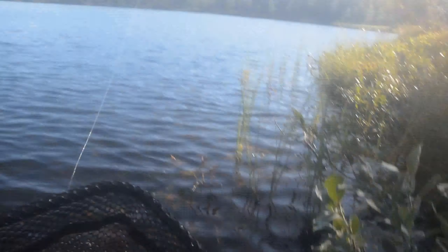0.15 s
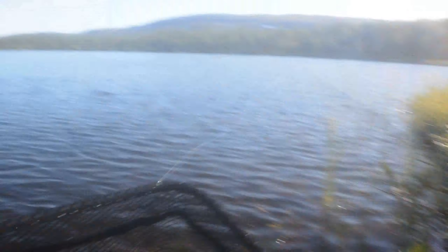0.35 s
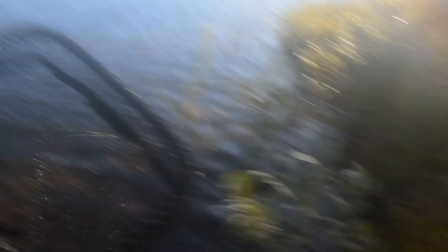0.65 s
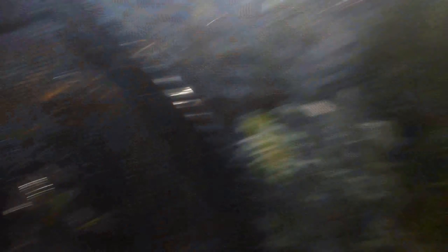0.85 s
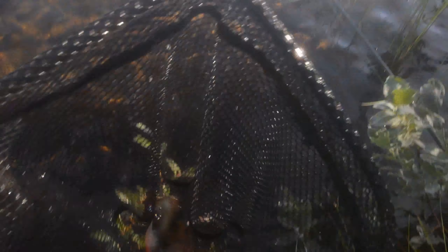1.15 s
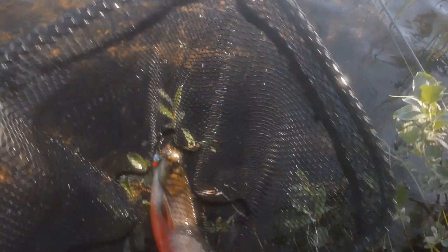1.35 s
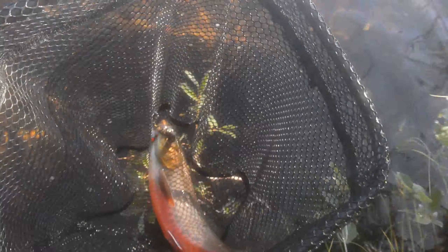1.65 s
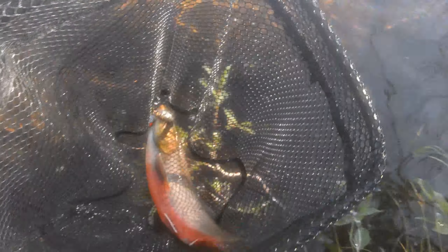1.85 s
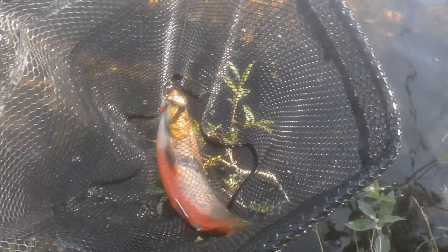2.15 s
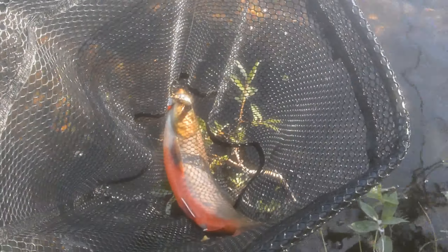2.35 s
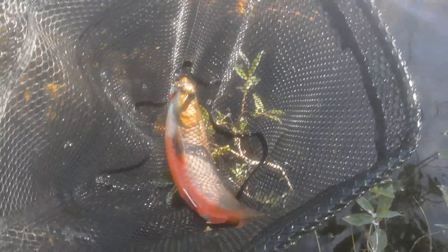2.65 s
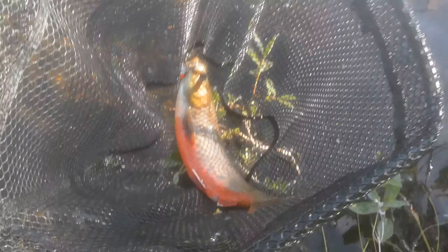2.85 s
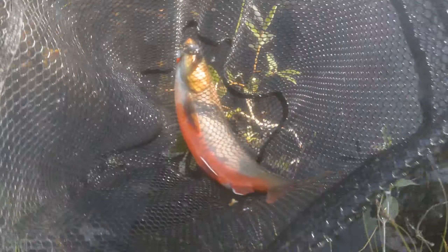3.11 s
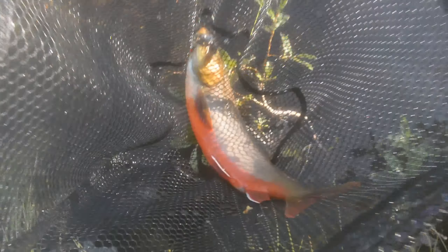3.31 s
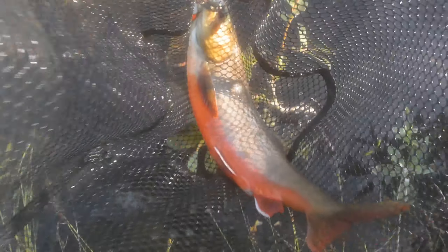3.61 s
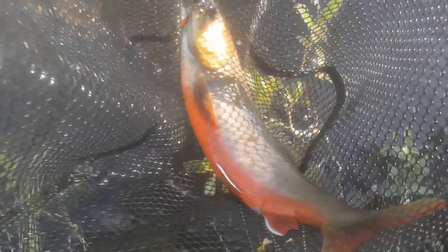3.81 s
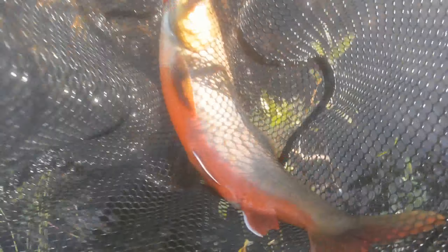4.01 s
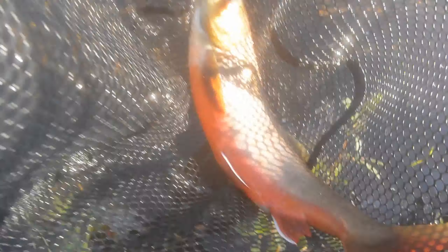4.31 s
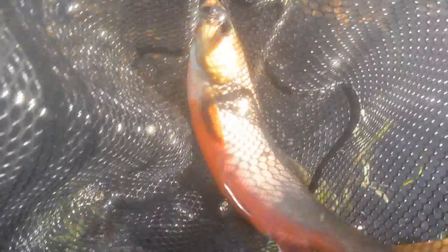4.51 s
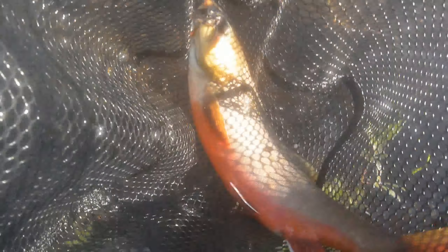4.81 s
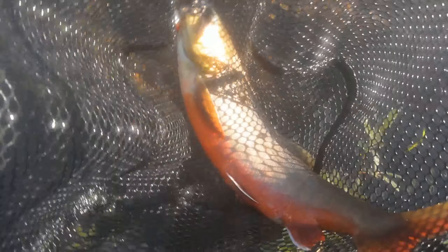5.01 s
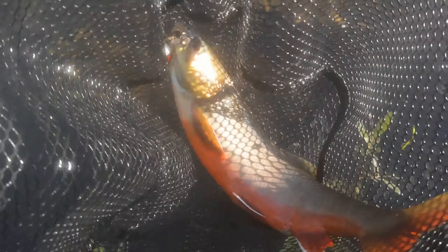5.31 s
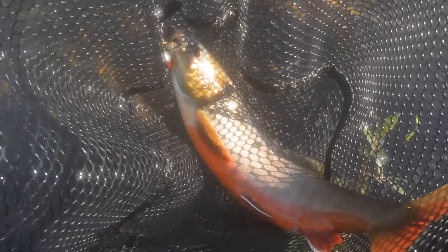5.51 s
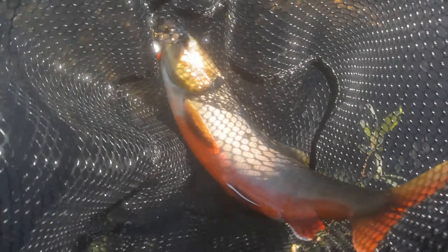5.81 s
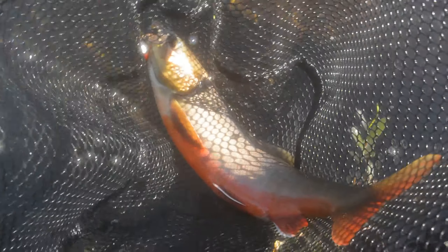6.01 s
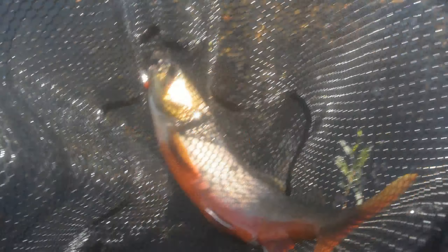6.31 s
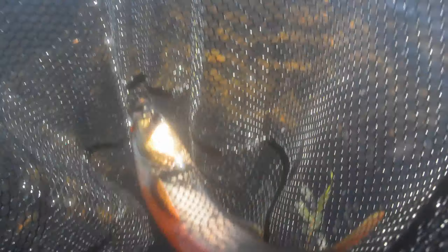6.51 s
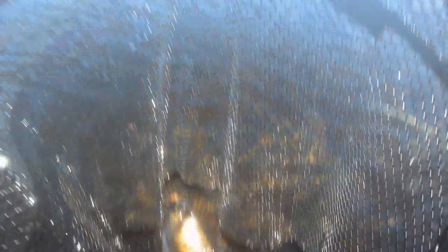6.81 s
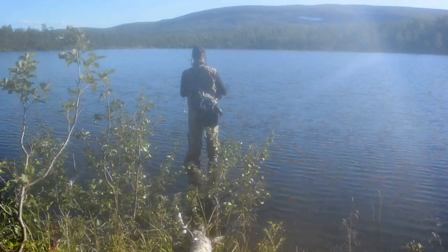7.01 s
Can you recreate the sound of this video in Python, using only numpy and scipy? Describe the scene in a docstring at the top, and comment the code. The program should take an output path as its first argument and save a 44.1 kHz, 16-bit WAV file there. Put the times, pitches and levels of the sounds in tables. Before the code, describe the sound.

Outdoors in shallow lake water, heard close and dry: soft slosh and squelch, a thin high whistle flaring once, then about half a second of crowded sharp slaps and splashing against a hollow plastic case. The background ducks after the hardest hits. Sparse ticks, knocks and drips follow over very quiet water, then a quick gushing splash, a bloop, and soft dripping.

```python
"""Water sloshes and squelches through the mesh of a landing net worked in the shallows of a lake.
It is heard close by, on a small stereo microphone in a plastic housing: the wash is banded noise and
droplets, slaps and drops ring the wet housing, squelches are crackle in a resonance, a whistle flares once.
A late splash drums in gushes and ends in a rising bubble; pushes rumble through the housing underneath.
A gain control ducks the background after the hardest slaps."""
import sys
import numpy as np
from scipy import signal
from scipy.io import wavfile

SR = 44100
rng = np.random.default_rng(int(sys.argv[2]) if len(sys.argv) > 2 else 0)


def unload_wav(signal):
    """Save mono or channel-first audio to the path in sys.argv[1] as 16-bit WAV at rate SR, clipped to [-1, 1]."""
    wavfile.write(
        sys.argv[1],
        SR,
        np.round(np.clip(np.atleast_2d(signal).T, -1, 1) * 32767).astype(np.int16),
    )


N = 315315   # samples
RIGHT_LAG = 5   # samples by which water reaches the right port later
WATER_TOP_HZ = 10340   # the wash has almost nothing above


def from_db(db):
    """Gain of a level in dB."""
    return 10 ** (np.asarray(db) / 20)


def rms_one(x):
    """Scaled to rms 1."""
    return x / np.sqrt(np.mean(x ** 2) + 1e-20)


def peak_one(x):
    """Scaled to peak 1."""
    return x / np.abs(x).max()


def in_time(rows):
    """Columns of a curve, joined by straight lines to one value a sample."""
    s, *columns = np.transpose(rows)
    return [np.interp(np.arange(N) / SR, s, column) for column in columns]


def at_hz(points, hz):
    """A spectrum read on a log-frequency axis."""
    points = np.array(points)
    return np.interp(np.log(hz), np.log(points[:, 0]), points[:, 1])


def drift(rate_hz):
    """A random curve of spread 1 that wanders mostly below the rate, drawn at every 40th sample."""
    r = np.exp(-80 * np.pi * rate_hz / SR)
    noise = rng.standard_normal(N // 40 + 2002)
    slow = rms_one(signal.lfilter([1], [1, -2 * r, r * r], noise)[2000:])   # settled part only
    return np.interp(np.arange(N) / 40, np.arange(len(slow)), slow)


def ring(clicks, hz, t60):
    """A damped mode: a unit click sets a sine of height 1 ringing, down 60 dB after t60 seconds."""
    r, w = from_db(-60 / (t60 * SR)), 2 * np.pi * hz / SR
    return signal.lfilter([0, np.sin(w)], [1, -2 * r * np.cos(w), r * r], clicks + 1e-18)


def resonance(x, hz, width_hz):
    """A band-pass of gain 1 on top."""
    r = np.exp(-np.pi * width_hz / SR)
    feedback = [1, -2 * r * np.cos(2 * np.pi * hz / SR), r * r]
    return signal.lfilter([(1 - r * r) / 2, 0, (r * r - 1) / 2], feedback, x)


def resonance_twice(x, hz, width_hz):
    """The same band-pass two times over, for steeper sides."""
    return resonance(resonance(x, hz, width_hz), hz, width_hz)


def high_pass(x, hz):
    """Bass cut of fourth order."""
    return signal.sosfilt(signal.butter(4, hz, "high", fs=SR, output="sos"), x)


def dull(x):
    """Almost nothing is left above the top of the wash."""
    return signal.sosfilt(signal.cheby2(10, 50, WATER_TOP_HZ, fs=SR, output="sos"), x)


def droplets(per_s, spread_db):
    """Sparse clicks of very uneven size, other ones on each side; rms 1."""
    sizes = from_db(spread_db * np.minimum(rng.exponential(1, (2, N)), 4))
    signed = sizes * rng.choice([-1, 1], (2, N))
    return rms_one(signed * (rng.random((2, N)) < per_s / SR))


# How alike left and right are across the spectrum.
# Each row: frequency in Hz, likeness from -1 (opposed) to 1 (identical).
LIKENESS = [(60, 0.33), (125, 0.4), (250, 0.5), (400, 0.7), (700, 0.1), (1650, 0.5), (4970, -0.16),
            (15000, 0.6)]


def banded(source, spectrum, edges, level_db, patchy_db):
    """Half-octave bands of a stereo source, each with its level in time, flicker and likeness."""
    out, together = 0, drift(22.0)
    for k, (low, high) in enumerate(zip(edges, edges[1:])):
        band_pass = signal.butter(2, [low, high], "band", fs=SR, output="sos")
        mid, side = signal.sosfilt(band_pass, source[k % 2])   # neighbours use different noise
        hz = np.sqrt(low * high)
        alike = np.clip(at_hz(LIKENESS, hz), -1, 1)
        flicker_db = patchy_db * (0.61 * together + drift(13))
        gain = from_db(at_hz(spectrum, hz) + level_db(hz) + flicker_db)
        stereo = np.sqrt(1 + alike) * mid + np.sqrt(1 - alike) * side * [[1], [-1]]
        out = out + gain * stereo
    return out


# Colour of the rumble. Each row: frequency in Hz, relative level per Hz in dB.
RUMBLE = [(12, -28), (20, -6), (33, -13.5), (75, -8), (130, -10.5), (205, -3), (260, -3), (320, -33),
          (550, -120)]
# Pushes through the housing. Each row: peak time in seconds, relative peak level in dB.
PUSHES = [(0.0, -43), (0.696, -35.5), (0.722, -52), (0.752, -26.5), (0.97, -37.5), (1.002, -36.5),
          (1.08, -45), (1.41, -50), (1.61, -57), (2.03, -71), (2.43, -64), (3.09, -49.5), (3.46, -58),
          (4.66, -57), (5.06, -70), (6.27, -57), (6.75, -61), (7.07, -53)]
PUSH_RISE_DB_PER_S, PUSH_FALL_DB_PER_S = 600.5, 602.5
MURMUR_DB = -68   # on the scale of the pushes


def rumble():
    """Handling and water pushes over a steady murmur; the pushes are weaker in the deepest bass."""
    t = np.arange(N) / SR
    push = 0
    for s, db in PUSHES:
        fall_away_db = np.maximum(PUSH_RISE_DB_PER_S * (s - t), PUSH_FALL_DB_PER_S * (t - s))
        push = push + from_db(db - fall_away_db)

    def band_db(hz):
        """Push and murmur added as amplitudes."""
        return 23.4 + 20 * np.log10(push * from_db(-6 * (hz < 55)) + from_db(MURMUR_DB))
    edges = 20 * 2 ** np.arange(0, 4.1, .5)
    return banded(rng.standard_normal((2, 2, N)), RUMBLE, edges, band_db, patchy_db=1.5)


WHISTLE_HZ, WHISTLE_WIDTH_HZ = 14330, 120
WHISTLE_S, WHISTLE_WIDTH_S = 0.485, 0.21   # moment of the flare, scale of its skirts
WHISTLE_DB, WHISTLE_FADE_DB = -35.5, 138.5


def whistle():
    """A thin high whistle flares once: noise through a narrow resonance, sharp peak and long skirts in time."""
    tone = resonance_twice(rng.standard_normal(N), WHISTLE_HZ, WHISTLE_WIDTH_HZ)
    away = np.abs(np.arange(N) / SR - WHISTLE_S) / WHISTLE_WIDTH_S
    fade_db = WHISTLE_FADE_DB * away / (1 + away) + WHISTLE_FADE_DB * away / 10
    return from_db(WHISTLE_DB - fade_db) * rms_one(tone)


# Sloshing in time. Each row: time in seconds, relative level of the body (1.2-3.5 kHz) in dB,
# gurgle below it and spray above it as tilts in dB against the body.
SLOSH = [(0.0, -37.5, 1.5, -9), (0.16, -33.5, -4.5, -9.5), (0.26, -39, -1, -10.5), (0.6, -41, 2, -8.5),
         (0.76, -36, 3.5, -12), (0.825, -26.5, -5, 0), (0.834, -44, -8, -24), (0.843, -32, -14, -21),
         (0.852, -30, -8, -11), (0.89, -25.5, -3, -10), (0.97, -27.5, 1, -11), (1.04, -41.5, 2.5, -7),
         (1.2, -51.5, -2.5, -9.5), (1.42, -51.5, 7.5, -6.5), (1.54, -54, 5, -9.5), (1.92, -60, 2.5, -8),
         (2.44, -56, 3.5, -13), (2.82, -59, 3, -11.5), (3.1, -53, 3.5, -10.5), (3.26, -53, 2, -14),
         (3.38, -42, -6.5, -18), (3.48, -50, 2, -15), (3.56, -54.5, 3.5, -7.5), (3.94, -54.5, 1.5, -11.5),
         (4.1, -50.5, -1, -13.5), (4.42, -55.5, 1, -10.5), (4.64, -54.5, 8, -8), (4.9, -58.5, 3, -14.5),
         (5.2, -62, 4.5, -11), (5.9, -61, 2.5, -11), (6.02, -56.5, -0.5, -16), (6.3, -56.5, 1.5, -11),
         (6.6, -53, 1.5, -12.5), (6.88, -50.5, 5, -11), (7.105, -50.5, 7.5, -6.5), (7.125, -67, 9, -11),
         (7.15, -57, -8, -15)]
# Colour of the water. Each row: frequency in Hz, relative level per Hz in dB.
WATER = [(120, -36), (200, -10.5), (409, -4.5), (1120, -2), (1650, -12), (2700, -5.5), (4520, -9.5),
         (5630, -22.5), (7680, -24), (9060, -28), (9930, -60.5), (10900, -29.5), (11500, -53),
         (12400, -43.5), (16000, -60.5)]
# Resonances added to the water. Each row: frequency in Hz, width in Hz, gain in dB.
WATER_PEAKS = [(403, 290, -3.5), (1997, 220, 1.5), (2560, 1400, -11.5), (4860, 310, 4.5), (7000, 634, 14)]


def slosh():
    """Hiss and droplets in the colour of the water; gurgle and spray lean on the level of the body."""
    body_db, gurgle_db, spray_db = in_time(SLOSH)

    def band_db(hz):
        """Body, with gurgle or spray blended in by pitch."""
        octave = np.log2(hz / 1000)
        low = np.interp(octave, [-.3, .6], [1, 0])
        high = np.interp(octave, [1.4, 2.2], [0, 1])
        return body_db + low * (gurgle_db - 3.0) + high * (spray_db + 7.5) + 12
    source = rng.standard_normal((2, 2, N)) + 0.47 * droplets(400, spread_db=5.5)
    edges = 190 * 2 ** np.arange(0, 6.6, .5)
    water = banded(source, WATER, edges, band_db, patchy_db=2.0)
    return water + sum(from_db(db) * resonance(water, hz, width_hz) for hz, width_hz, db in WATER_PEAKS)


# Water squeezed through the mesh. Each row: start in seconds, length in seconds, relative level in dB,
# pitch of the pocket in Hz, width of its resonance in Hz.
SQUELCHES = [(0.049, 0.027, -44, 2330, 300), (0.088, 0.03, -45.5, 447, 250),
             (0.095, 0.11, -40.5, 4300, 800), (0.123, 0.026, -42, 800, 500), (0.155, 0.014, -46, 468, 300),
             (0.169, 0.084, -42.5, 4290, 400), (0.168, 0.066, -47, 750, 300),
             (0.695, 0.035, -42, 3500, 3000), (0.768, 0.02, -35, 2510, 3000), (0.615, 0.035, -46, 660, 895),
             (0.676, 0.037, -38, 4300, 3270), (0.743, 0.028, -26.5, 2500, 4100),
             (0.785, 0.063, -35, 417, 304), (0.847, 0.098, -34, 420, 300), (0.92, .17, -47, 392, 250),
             (0.984, 0.12, -44.5, 2310, 1810), (0.955, 0.052, -34, 1920, 900), (1.11, 0.24, -57, 413, 196),
             (1.417, 0.061, -53.5, 455, 302), (1.447, 0.013, -45.5, 1160, 400),
             (1.411, 0.0056, -32.5, 1470, 2460), (0.298, 0.038, -46, 2100, 600),
             (0.384, 0.045, -43, 2160, 500), (0.455, 0.1, -46.5, 2100, 450),
             (0.436, 0.069, -49, 7150, 1500), (3.138, 0.023, -52.5, 2120, 300),
             (3.293, 0.026, -55, 2260, 1500), (3.351, 0.15, -56, 466, 348), (3.496, 0.031, -45, 2180, 500),
             (3.76, 0.12, -55, 1890, 303), (3.765, 0.11, -49.5, 2800, 550),
             (3.748, 0.13, -51.5, 4100, 1860), (4.618, 0.067, -57, 1180, 1500),
             (6.45, 0.06, -36.5, 456, 50), (7.032, 0.084, -48, 2450, 2920)]
ALIKE_BELOW_HZ = 1200   # deeper squelches reach both ports more alike


def squelches():
    """Crackling droplets twice through the resonance of the squeezed pocket."""
    out, crackle = np.zeros((2, N)), droplets(2500, spread_db=3.0)
    for s, length_s, level_db, hz, width_hz in SQUELCHES:
        at, n = round(s * SR), round(length_s * SR)
        shared = crackle[0, N - at - n:N - at]   # the same on both sides
        near = crackle[:, at:at + n] + ALIKE_BELOW_HZ / hz * shared
        pocket = rms_one(resonance_twice(near, hz, width_hz))
        out[:, at:at + n] += from_db(level_db + 7.0) * signal.windows.tukey(n, .4) * pocket
    return out


# Single bubbles. Each row: start in seconds, level at the start in dB (mean of both sides),
# start pitch in Hz, end pitch in Hz, length in seconds, t60 in seconds.
BUBBLES = [(6.589, -22, 885, 1760, .081, .25), (6.293, -30, 800, 950, .035, .1)]
BUBBLE_BEND = .18   # smaller: the climb comes later


def bubbles():
    """A bubble's pitch climbs ever faster as it nears the surface, where it bursts."""
    out = np.zeros(N)
    for s, peak_db, start_hz, end_hz, length_s, t60 in BUBBLES:
        at, t = round(s * SR), np.arange(round(length_s * SR)) / SR
        life = t / length_s
        climb = life ** 2 * BUBBLE_BEND / (1 + BUBBLE_BEND - life)
        hz = start_hz + (end_hz - start_hz) * climb
        fade = np.minimum(1, (length_s - t) / 0.004)
        tone = np.sin(2 * np.pi * np.cumsum(hz) / SR)
        out[at:at + len(t)] += from_db(peak_db - 60 * t / t60) * fade * tone
    return out * from_db([[-1.0], [1.0]])   # a little to the right


# Gushes of the late splash over the housing. Each row: start in seconds, length in seconds,
# relative level in dB, brightness in dB per octave, extra on modes below 500 Hz in dB,
# extra on modes above 2.2 kHz in dB.
POUR = [(6.266, 0.03, -21, -0.5, -15, -2), (6.342, 0.021, -29.5, -2, -11, -6),
        (6.366, 0.031, -28, -2, -6, -3.5), (6.392, 0.026, -28, -1.5, -12, 0),
        (6.418, 0.034, -27, -0.5, -5, -5), (6.456, 0.017, -18, 1, -7, 8.5),
        (6.48, 0.054, -25.5, 2.5, -12, -1), (6.512, 0.0092, -29, -4, -14, 0),
        (6.517, 0.034, -25.5, 4.5, 1, -1)]
# Modes of the wet housing, rung by gushes and slaps alike.
# Each row: nominal frequency in Hz, relative level in dB, t60 in seconds under a slap.
HOUSING = [(425, -4, .04), (550, -8, .03), (770, -4, .025), (915, -5, .03), (1130, -8, .015),
           (1480, -9, .02), (1890, -2, .02), (2300, -7, .012), (2700, -11, .02), (3400, -16, .004),
           (4200, -6, .006), (5200, -9, .003), (7200, -17, .002)]
POUR_TOP_HZ, SPRAY_HZ = 3100, 3800   # top of the soft drumming; centre of the veil of spray
GUSH_ATTACK_S, GUSH_SAG_DB_PER_S, GUSH_RELEASE_DB_PER_S = 0.0052, 46, 993
GUSH_DETUNE = .025   # running water scatters the modes, as a share of their pitch
GUSH_WET_DB = -4   # part of the drumming is damped short
GUSH_CHANCE_DB = 1.2   # each gush favours other modes


def pour():
    """Dense soft drops come in quick gusts and drum on the lower modes of the housing, under a veil of spray."""
    out, t = np.zeros((2, N)), np.arange(SR // 4) / SR
    rain = droplets(550, spread_db=2.0) * from_db(1.9 * drift(83))
    for s, length_s, level_db, bright_db, low_db, top_db in POUR:
        at = round(s * SR)
        falling = rain[:, at:at + len(t)]
        soft = 0.46 * falling[0] + falling
        drum = 0
        for (hz, db, t60), shift in zip(HOUSING, rng.normal(1, GUSH_DETUNE, len(HOUSING))):
            if hz < POUR_TOP_HZ:
                long_ring = ring(soft, hz * shift, 1.9 * t60)
                short_ring = ring(soft, hz * shift, 0.26 * t60)
                both = long_ring + from_db(GUSH_WET_DB) * short_ring
                tilt_db = bright_db * np.log2(hz / 1000) + low_db * (hz < 500) + top_db * (hz > 2200)
                mode_gain = from_db(db + rng.normal(0, GUSH_CHANCE_DB) + tilt_db)
                drum = drum + mode_gain * resonance(both, hz * shift, hz / 3)
        spray = dull(rms_one(resonance_twice(falling, SPRAY_HZ, SPRAY_HZ / 2)))
        gush = rms_one(drum) + from_db(-20.5 + 2.0 * bright_db) * spray
        sag_db = GUSH_SAG_DB_PER_S * t.clip(0, length_s)
        release_db = GUSH_RELEASE_DB_PER_S * (t - length_s).clip(0)
        attack = (t / GUSH_ATTACK_S).clip(0, 1)
        out[:, at:at + len(t)] += from_db(level_db - sag_db - release_db) * attack * gush
    return out


DROP_COUNT, DROP_OVER_WASH_DB = 24, 10   # least height over the wash's body figure, before the cap
DROP_TOP_DB = -51   # a cap that holds nearly every drop
DROP_CYCLES, DROP_HOUSING_DB, DROP_THUD_DB, DROP_CRACK_DB, DROP_SPRAY_DB = 13, -8, -16, -7, -55


def drops():
    """Slap rows for faint small drops of nearly even loudness, at chance moments, pitches and sides."""
    rows, wash_db = [], in_time(SLOSH)[0]
    for when, pitch, size, side in rng.random((DROP_COUNT, 4)):
        s = when * (N - 1) / SR
        peak_db = min(wash_db[int(s * SR)] + DROP_OVER_WASH_DB + 6 * size, DROP_TOP_DB)
        own_hz, pan_db = 380 * 2 ** (2.2 * pitch), 12 * (side - .5)
        rows.append((s, peak_db, own_hz, DROP_CYCLES, DROP_HOUSING_DB, DROP_THUD_DB, DROP_CRACK_DB,
                     DROP_SPRAY_DB, pan_db))
    return rows


# Slaps of water. Each row: start in seconds, peak in dB before bass cut and gain control, own pitch in Hz,
# cycles it rings; then relative to the own pitch in dB: housing modes of 1-3 kHz, its lowest modes,
# its highest modes, finest spray; last, left over right in dB.
SLAPS = [(.024,-26,590,9.8,-33,-34,-16,-32,-5), (.36,-21,2220,33,-12.5,-24,-7.5,-55,18),
         (.404,-30,2250,23,-15,-26,-14,-55,13), (.636,-28,704,12,-3,1,-1,-50,-7),
         (.66,-27,2000,10,-5,-14,-3,-55,-4), (.675,-37,2020,10,-8,-7,2,-55,-4),
         (.685,-21,4800,13,10,3,0,-55,-2), (.691,-16,7040,13,-5.5,-12,1,-45,24),
         (.697,-11.5,6440,16,-13,-7.5,2,-50,10), (.701,-13,3740,14,-16,-20,7,-42,11),
         (.719,-11,563,5,-20,-28,-26,-66,-2), (.739,-15.5,2220,24,-7,-4,2,-46,1),
         (.745,-7.5,460,6,-0.5,-10,-14,-49,-12), (.748,-9.5,2230,36,-11,-3,-9,-40,6),
         (.753,-1,4090,26,0,-11,4,-16,15), (.759,2,4720,16,-15,-33.5,5,-2,2),
         (.783,1.5,2160,25,-4,-14.5,-10,-35,1), (.788,-11,895,10,-4.5,-5,18,-46,10),
         (.81,-20,437,9,-20,-10,-26,-60.5,0), (.807,-6,2030,16,-14,-13,-8,-50,-22),
         (.82,-11,430,8.3,-20,-12,-26,-61,-4), (.8265,10.5,3110,10,-24.5,-43,-9.5,-20,-7.5),
         (.832,-2,2300,12,-5,-30,-1,-34,-15), (.847,5,2700,8.6,-27,-40,-10,-48,-3),
         (.856,-6,454,6.6,-7,-11,8,-45,2), (.878,9.5,1740,4.1,-7,-13,1,-37,2.5),
         (.884,-7.5,2500,13,-13,-9,-5,-55,0), (.906,-10,1700,10,-8,-19,-5,-55,2),
         (.93,-1.5,2030,15,1.5,-11,3,-55,-2), (.945,-12.5,1390,15,-16,-21,4,-55,9),
         (.962,-9,2020,18,-2,-2,-20,-74,-3), (.967,-8,1910,16,1,-5,-16,-60,1),
         (.974,-14,1410,11,-11,-14,-16,-60,6), (.977,-17,454,7,-15,-10,-20,-60,-1),
         (.982,-15,1480,8.6,-12,-11,-5,-55,2), (.99,-19,550,5.8,-16,-13,-16,-60,-2),
         (.9955,-14,2500,8.9,-5,-12,2,-50,8), (1.003,-11,2600,5.4,-13,-19,-13,-59,-16),
         (1.008,-29,453,8,-8,-10,-16,-60.5,-7), (1.021,-17,2400,13,-14,-8,4,-50,2),
         (1.034,-29,2800,8,-13,-20,3,-55,5), (1.0535,-13.5,2040,33,-9,-18,2.5,-54,3.5),
         (1.078,-21,1920,11,-1.5,-3,4,-47,2), (1.301,-36.5,1270,21,-23,-28,-4,-45,-2),
         (1.365,-25,3100,30,-10,-25,-2,-49,-16), (1.371,-23,3280,16,-15,-21,2,-38,13),
         (1.376,-28,2660,11,-10,-18,-3,-55,-3), (1.409,-14.5,453,4,7,3,5.5,-44,0.5),
         (1.419,-18,540,6.7,-1,-14,4,-50,-2), (1.43,-29,3560,14,-1,-15,-8,-55,6),
         (1.446,-26,1130,18,-12,-8,-1,-52,10), (1.478,-35,4450,16,-17,-18,-6,-45,13),
         (1.497,-25,2220,22,-14,-22,-8,-52,2), (1.532,-39.5,2000,12,-7,3,-10,-58,-2),
         (1.58,-16.5,2240,18,2,-8,3.5,-37,-1), (1.6365,-24,3070,16,-9.5,-35,-5.5,-36,-0.5),
         (1.6385,-26,2760,20,-15,-32,-8,-45,9), (1.642,-19.5,2490,22,-14.5,-25,2,-48,0),
         (2.003,-35.5,3200,12,-10,-20,7,-40,1), (2.115,-40,6800,16,-34,-43,-14,-44,-7),
         (2.745,-25.5,2000,36,2,-3.5,-19,-61,-3.5), (3.081,-18,521,34,2.5,-0.5,3.5,-61,-0.5),
         (3.082,-28,2300,14,-10,-26,-21,-62,12), (3.101,-29.5,425,4.8,5,4,-15,-60,6),
         (3.165,-25,1070,14,2,-5,-18,-66,1), (3.271,-38.5,880,11,-2,-17,-10,-60,2),
         (3.378,-15.5,1090,28,4,-6.5,6,-48,1.5), (3.379,-30,4150,52,-26,-39,-2,-49,16),
         (3.442,-35,1230,31,-16,-24,-19,-60,-2), (3.516,-34.5,2110,17,0,0,-15,-67,-7),
         (3.69,-15,4150,69,-27,-54,9.5,-33,-5), (3.778,-23,4250,86,-30,-30,4,-50,-1),
         (4.482,-19.5,448,12.4,-4,-12,-9,-65,0.5), (4.614,-23.5,2950,10,4,-1.5,3,-58,4.5),
         (4.649,-37,422,6.6,-15,-10,3,-58,3), (4.691,-33,774,13,-19,-20,-13,-58,3),
         (4.761,-40,760,12,-9,-9,-10,-59.5,-4), (4.783,-27,724,7.6,-10,-8,-20,-69,4),
         (5.0407,-7,4300,14,1,-12.5,6.5,-9.5,10), (5.044,-23,1060,11,-7,-2.5,-9,-49,-9.5),
         (5.048,-23,4000,20,-1,-22,-11,-43,0), (5.65,-38,2270,15,-23.5,-16,-16,-62.5,-6.5),
         (5.67,-39,473,11,-4,-16.5,-12,-60,1.5), (5.806,-40.5,7140,39,-23,-40,-13,-44,-4),
         (6.268,-6.5,1900,49,-6,-16,-15,-40,-7.5), (6.2715,-11.5,1950,6.8,-14.5,-39,-34.5,-71,7),
         (6.344,-19.5,880,10,-6,-17,-35,-83,-11), (6.448,-12.5,1040,11,7.5,-1,-8,-72,-6),
         (6.451,-18.5,2050,27,-10,-8,-6.5,-58,-2), (6.465,-22,2000,16,-6,5,-18,-60,-4),
         (6.504,-12,2195,35,5,-9,2,-29,3), (6.589,-20.5,3000,7.1,-19.5,-31,-7,-35,-2.5),
         (6.634,-22.5,2210,13,-11,-19,-8.5,-57,-4), (6.737,-27.5,473,20,-3.5,-5,-4,-64,0),
         (6.784,-36,910,13,-9,-15,-4,-58,1), (6.809,-33.5,503,14,-4,-15,-7,-60,-10),
         (6.83,-33,2190,28,-6,-16,-3,-56,16), (6.886,-26.5,2000,25,-8,-16.5,-20,-65,8),
         (6.921,-34,3000,18,-10,-13,-8,-50,1), (6.936,-27.5,800,6.2,-19,-26,-1,-54,13),
         (6.988,-26.5,460,18,-5,-16,-9,-56,-3), (7.005,-26,487,11,0,-10,-5,-57,-1),
         (7.024,-29,460,11,-4,-19,-7,-61,1), (7.053,-23.5,430,6.5,-2,-13,8,-52,5),
         (7.065,-27,440,14,2,-10,-15,-57,2), (7.076,-23.5,416,20,-0.5,-10,4,-61,0),
         (7.108,-31,4770,16,-8,-22,2,-50,12)]
CONTACT_S = 0.0015   # how long water and surface meet, at housing level 0 dB
CONTACT_FOLLOWS = 0.22   # slaps that move the housing more last longer (dB per dB)
TAP_SHARPNESS = 6.0   # the slap's own pitch is set off by the first touch only
OPPOSED_HZ = 3500   # own pitches above move the two ports oppositely
AIR_HZ = 11900   # finest spray of a slap


def slaps(rows):
    """A short burst of contact noise rings one pitch of the slap's own and the housing, detuned anew each time."""
    out, t = np.zeros((2, N + SR)), np.arange(SR // 10) / SR
    for s, peak_db, own_hz, cycles, body_db, thud_db, crack_db, air_db, pan_db in rows:
        shared, own = rng.standard_normal(len(t)), rng.standard_normal((2, len(t)))
        age = t / max(CONTACT_S * from_db(CONTACT_FOLLOWS * body_db), 1e-4)
        burst = (shared + 0.4 * own) * np.minimum(7.2 * age, 1) * np.exp(-age)

        touch = burst * np.exp(-TAP_SHARPNESS * age)
        own_ring = ring(touch, own_hz, max(cycles, 2) / own_hz)
        sound = peak_one(resonance(own_ring, own_hz, own_hz)) * [[1], [-1 if own_hz > OPPOSED_HZ else 1]]

        chance_db = rng.normal(0, 1.5, (len(HOUSING), 2, 1))
        detune = rng.normal(1, 0.025, len(HOUSING))
        flip = rng.choice([-1, 1], len(HOUSING))   # higher modes often move the two ports oppositely
        for (hz, db, t60), extra_db, shift, sign in zip(HOUSING, chance_db, detune, flip):
            tilt_db = thud_db if hz < 1000 else body_db if hz < 3000 else crack_db
            mode = peak_one(resonance(ring(burst, hz * shift, t60), hz, hz))
            sound = sound + from_db(db + tilt_db + extra_db) * mode * [[1], [sign if hz > 600 else 1]]

        air = peak_one(resonance_twice(burst * np.exp(-age), AIR_HZ, AIR_HZ / 2))
        sound = dull(sound) + from_db(air_db + 1.0) * air * [[1], [-1]]
        sound = sound * from_db(pan_db * np.array([[.5], [-.5]]))
        # the peak is that of both ports together, unless they nearly cancel
        between = (sound[0, RIGHT_LAG:] + sound[1, :-RIGHT_LAG]) / 2
        height = max(np.abs(between).max(), 0.21 * np.abs(sound).max())
        at = round(s * SR)
        out[:, at:at + len(t)] += from_db(peak_db) * sound / height
    return out[:, :N]


HIT_BASS_CUT_HZ = 273   # the small housing gives off little deeper
BASS_CUT_HZ = 230   # of the microphone, for sound in air


def scene():
    """All sources, heard close and dry; the water reaches the left port first."""
    wash = slosh() + squelches()
    hits = high_pass(slaps(SLAPS + drops()) + pour(), HIT_BASS_CUT_HZ)
    water = dull(wash) + from_db(-11.0) * wash + hits + bubbles() + whistle()
    water[1] = np.concatenate([np.zeros(RIGHT_LAG), water[1, :-RIGHT_LAG]])
    return high_pass(water, BASS_CUT_HZ) + rumble()


THRESHOLD_DB, SHARE = -12, 0.94   # the part of the excess in dB that is taken off
RELEASE_DB_PER_S, ATTACK_S = 150, 0.0089
OFFSET = .0024   # constant shift of the waveform, ahead of the gain control
CUTOFF_HZ = 16300


def record(dry):
    """Gain control that reacts just after a peak and recovers steadily, offset included; overload, top cut."""
    t = np.arange(N) / SR
    loudness_db = 20 * np.log10(np.abs(dry).max(axis=0) + 1e-9)
    over_db = SHARE * np.maximum(loudness_db - THRESHOLD_DB, 0)
    held_db = np.maximum.accumulate(over_db + RELEASE_DB_PER_S * t) - RELEASE_DB_PER_S * t
    r = np.exp(-1 / (ATTACK_S * SR))
    duck_db = signal.lfilter([1 - r], [1, -r], held_db)
    overloaded = np.clip((dry + OFFSET) * from_db(-duck_db), -1, 1)
    return signal.sosfilt(signal.cheby2(14, 90, CUTOFF_HZ, fs=SR, output="sos"), overloaded)


dry = scene()
out = record(dry)
unload_wav(out)
```